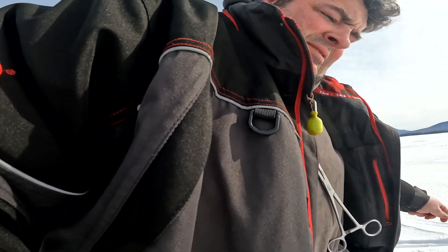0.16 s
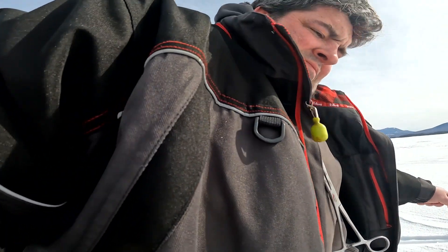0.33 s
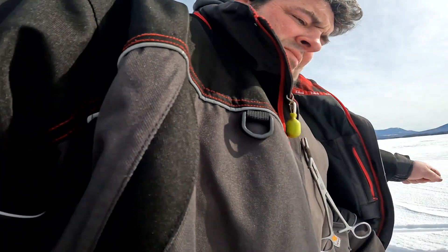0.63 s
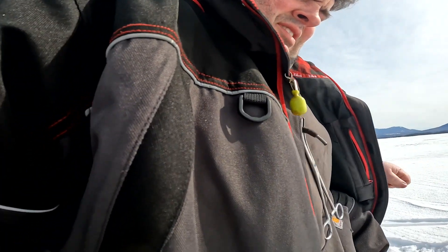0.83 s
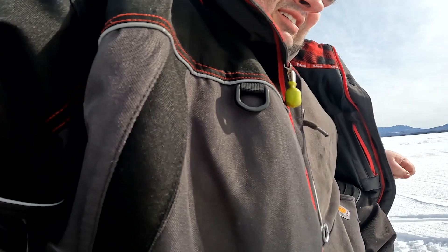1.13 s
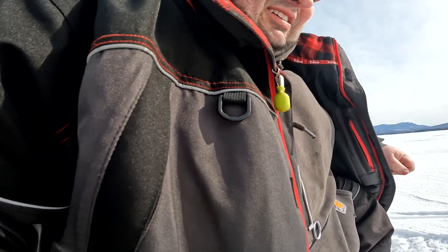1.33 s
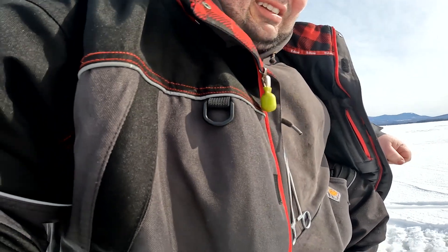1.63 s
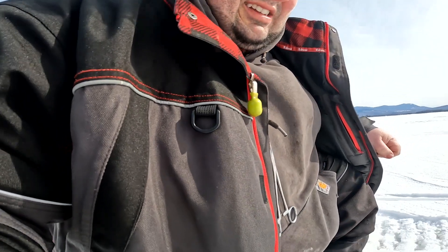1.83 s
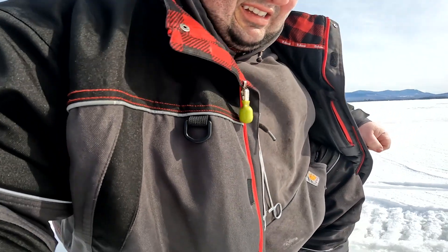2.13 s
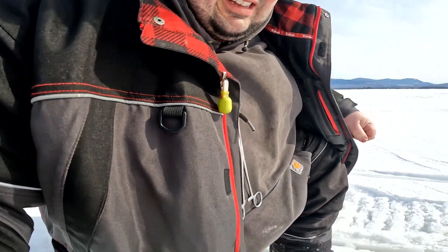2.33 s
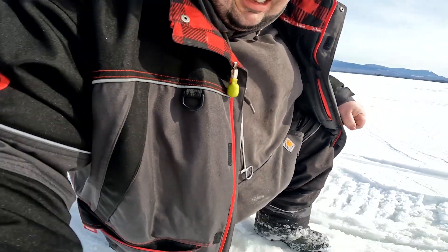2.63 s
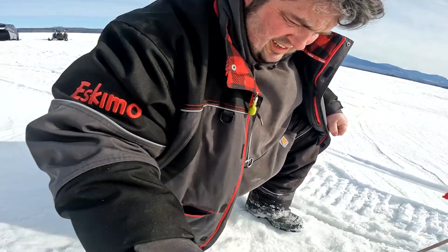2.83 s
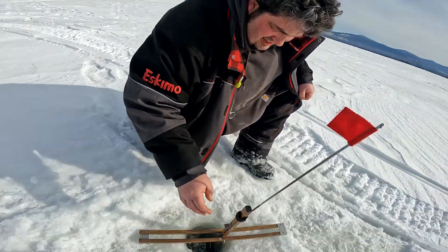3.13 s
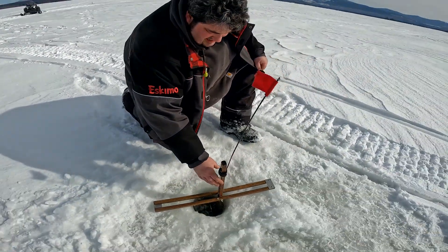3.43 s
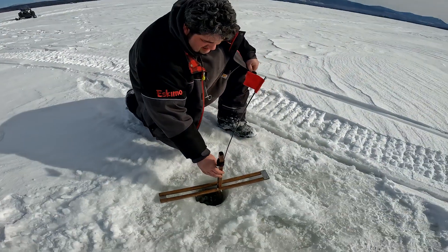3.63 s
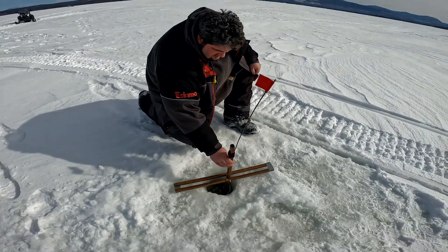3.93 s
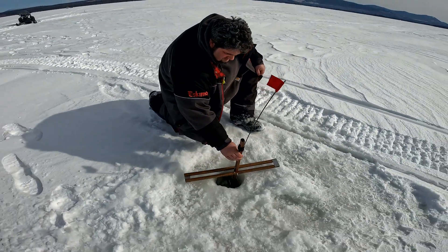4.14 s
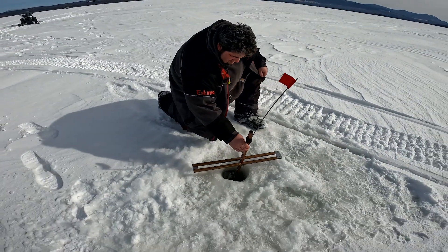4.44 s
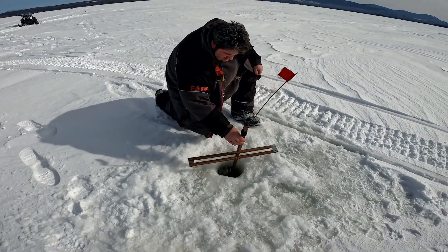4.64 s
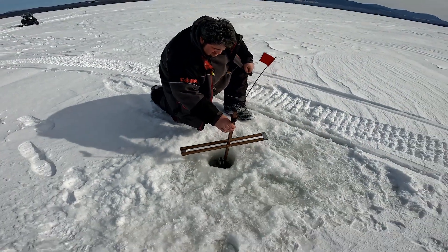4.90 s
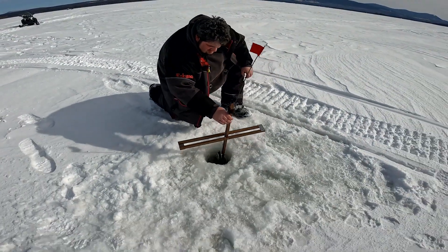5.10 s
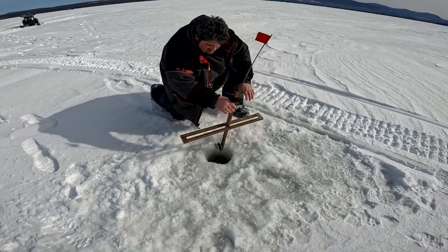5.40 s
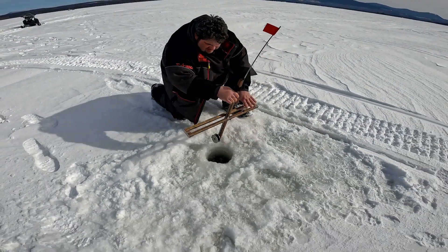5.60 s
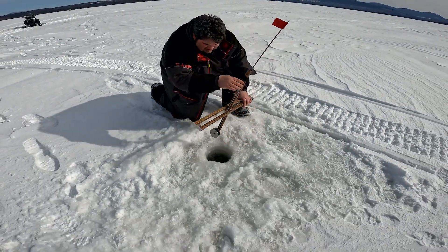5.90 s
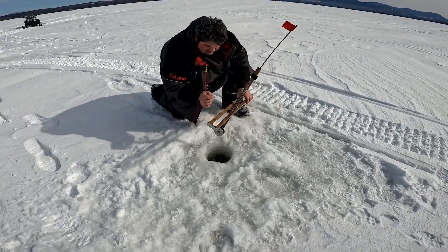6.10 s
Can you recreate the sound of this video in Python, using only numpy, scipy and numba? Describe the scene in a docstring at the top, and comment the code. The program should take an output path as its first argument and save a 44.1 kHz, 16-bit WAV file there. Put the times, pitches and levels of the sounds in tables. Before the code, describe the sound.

Boots crunch and creak on crusty snow while stiff cloth scuffs and knocks the microphone, then wind rumble swells and wooden slats rattle.

```python
"""Someone handles a small camera and steps about on crusty snow on a frozen lake, in wind and open-air hiss.
At first snow and stiff jacket cloth break into short decaying sines: cracks, squeaks, scuffs, housing knocks.
Just after 1 s packed snow creaks by stick and slip, ringing a few low modes.
From about 3.4 s filtered noise of wind on the microphone grows into a rumble, and the top treble weakens.
Near the end wooden slats rattle on their modes, each tap bouncing a few times."""
import sys
import numpy as np
from scipy import signal
from scipy.fft import rfft, irfft
from scipy.io import wavfile
from scipy.ndimage import uniform_filter1d
from numba import njit

SR = 44100
rng = np.random.default_rng(int(sys.argv[2]) if len(sys.argv) > 2 else 0)


def wrap_up_sound(samples):
    """Save the sound to the file named by the first command line argument, as 16-bit audio."""
    columns = np.atleast_2d(samples).T
    # keep every value between -1 and 1, then stretch to whole-number steps
    tamed = np.clip(columns, -1, 1)
    steps = np.round(tamed * 32767).astype(np.int16)
    wavfile.write(sys.argv[1], SR, steps)


N = 276021  # length in samples


def undb(db):
    """Amplitude ratio of a level in dB."""
    return 10 ** (np.asarray(db) / 20)


def level(x, db):
    """Scale a signal to an rms level in dB re 1."""
    return x * undb(db) / np.sqrt(np.mean(x ** 2))


def curves(table):
    """Linear interpolation: columns of a table joined by straight lines, one value a sample."""
    s, *columns = np.transpose(table)
    return [np.interp(np.arange(N) / SR, s, c) for c in columns]


def colour(x, points):
    """Minimum-phase filtering: a causal response through f/Hz, gain/dB points, by way of the cepstrum."""
    hz, db = np.transpose(points)
    grid_hz = np.arange(1, 1026) * SR / 2048
    log_gain = np.interp(np.log(grid_hz), np.log(hz), db) * np.log(10) / 20
    cepstrum = irfft(log_gain)
    # folding the cepstrum onto positive time makes the response causal
    cepstrum[1:1024] *= 2
    cepstrum[1025:] = 0
    impulse = irfft(np.exp(rfft(cepstrum)))[:1024]
    return signal.fftconvolve(x, impulse)[:len(x)]


@njit
def low(x, hz, damp):
    """State-variable low-pass: two integrators in a loop, with an edge that may move every sample."""
    y, band, lowpass = np.empty(len(x)), 0., 0.
    for i in range(len(x)):
        g = np.tan(np.pi * hz[i] / SR)
        v = (band + g * (x[i] - lowpass)) / (1 + g * (g + damp))
        y[i] = lowpass + g * v
        band, lowpass = 2 * v - band, lowpass + 2 * g * v
    return y


@njit
def grains(out, s, hz, t60, size, rise):
    """Damped oscillation: each grain is a fading sine that swells over `rise` cycles, as a soft contact does."""
    y = np.zeros(out)
    for k in range(len(s)):
        turn = np.exp(2j * np.pi * hz[k] / SR - np.log(1000) / (t60[k] * SR))
        closing = np.exp(-hz[k] / (rise * SR))
        z, shut, start = size[k] + 0j, 1., int(s[k] * SR)
        for n in range(start, min(out, start + int(t60[k] * SR))):
            y[n] += z.imag * (1 - shut)
            z *= turn
            shut *= closing
    return y


def walk(rate):
    """Slow random fluctuation: levels held 1 / rate seconds and smoothed twice; spread near 1."""
    k = int(SR / rate)
    held = np.repeat(rng.standard_normal(N // k + 1), k)
    return 1.89 * uniform_filter1d(uniform_filter1d(held, k), k)[:N]


def patter(count, mid_hz, octaves, cycles, spread_db):
    """Shot noise: many small breaks at random moments, exponentially spread in dB; rms 1."""
    when, sign = rng.random(count), rng.choice([-1., 1.], count)
    tone, strength = rng.standard_normal(count), rng.exponential(size=count)
    hz = np.clip(mid_hz * 2 ** (octaves * tone), 100, .45 * SR)
    size = sign * undb(spread_db * np.minimum(strength, 5.0))
    return level(grains(N, when * N / SR, hz, cycles / hz, size, 0.052), 0)


def blows(s, db, hz, crumble_s, break_cycles, cycles, count, octaves, after_db, rise):
    """Fracture cascade: a main break, then a dying swarm of splinters, most near its pitch, a few far above."""
    chance = rng.random((len(s), 3, count))
    lag = 3 * crumble_s * chance[:, 0] ** 1.5
    tone = np.clip(0.884 * hz[:, None] * 2 ** (octaves * chance[:, 1] ** 2), 100, .45 * SR)
    size = undb(db[:, None] + after_db) * (2 * chance[:, 2] - 1)
    size = size * np.exp(-lag / crumble_s) * (hz[:, None] / tone) ** 0.081
    when, tone = (s[:, None] + lag).ravel(), tone.ravel()
    swarm = grains(N, when, tone, cycles / tone, size.ravel(), 0.028)
    return grains(N, s, hz, break_cycles / hz, -undb(db), rise) + swarm


def air():
    """Broadband noise: spectrally shaped, slowly swelling hiss of the open lake."""
    # spectrum of the hiss: f/Hz, relative density/dB
    hiss_spectrum = [(120, -63), (200, -2), (756, -4.5), (3560, -19.5), (7380, -25), (10600, -41),
                     (12500, -31), (14500, -35), (15600, -92)]
    air_db = -55.5  # rms before the swell
    swell = undb(.9 * walk(6))
    return level(colour(rng.standard_normal(N), hiss_spectrum), air_db) * swell


def wind():
    """Turbulence at the microphone port: a deep rumble and uneven buffets whose upper edge varies."""
    # course of the gusts: t/s, buffet level/dB, rumble level before flutter/dB, buffet edge before wander f/Hz
    gusts = [(0, -45.5, -45, 113), (.4, -52, -64, 134), (.52, -46, -38, 134), (.63, -31, -36, 172),
             (.84, -56.5, -51, 104), (1.88, -40.5, -46, 122), (2.42, -37.5, -42, 112),
             (2.7, -47.5, -44.5, 103), (3.36, -28, -32, 168), (3.8, -36, -29.5, 132), (3.94, -22, -40, 177),
             (4.01, -34, -26.5, 123), (4.62, -30, -33, 132), (4.84, -25, -24.5, 198),
             (5.25, -24.5, -23.5, 160), (5.39, -31, -29.5, 145), (5.7, -23.5, -25.5, 199),
             (5.92, -27.5, -27, 194), (5.98, -39, -24.5, 121), (6.2, -34.5, -32, 127),
             (6.26, -39, -53, 111)]
    db, rumble_db, steady_hz = curves(gusts)
    wander_db = .8 * walk(20)
    edge_hz = steady_hz * undb(wander_db)
    deep = low(low(rng.standard_normal(N), np.full(N, 70.), 1.0), np.full(N, 90.), 1.07)
    deep = signal.sosfilt(signal.butter(2, 22, "high", fs=SR, output="sos"), deep)
    flutter_db = walk(14)
    eddies = rng.standard_normal(N) * undb(0.79 * flutter_db)
    # dividing by the root of the edge evens out the power as the band widens
    buffets = low(low(eddies, edge_hz, 1.0), edge_hz * 1.69, 1.23) / np.sqrt(edge_hz)
    buffets = signal.sosfilt(signal.butter(2, 75, "high", fs=SR, output="sos"), buffets)
    rumble = level(deep, 0) * undb(rumble_db + 0.93 * flutter_db)
    return undb(db) * level(buffets, 0) + rumble


def motion():
    """Power addition: gains of crunch, drag and rustle, each scuff climbing, sagging and sinking over a bed."""
    # restless shifting between the scuffs: t/s, crisp crunch gain/dB, dull drag gain/dB, fine rustle gain/dB
    shifting = [(0, -44, -38.5, -55.5), (.5, -42.5, -37, -52), (1.2, -47, -48.5, -59),
                (1.9, -48.5, -45.5, -59.5), (3.0, -47.5, -50, -56.5), (3.7, -46, -49.5, -55),
                (4.05, -40, -40.5, -57.5), (4.5, -53, -51.5, -78), (4.7, -61, -35.5, -57),
                (5.4, -42, -47, -52.5), (5.55, -60, -43.5, -51), (5.92, -46, -42, -51.5),
                (5.97, -57, -64, -52.5), (6.26, -56, -65, -60)]
    # scuffs of boot on crust and sleeve on housing:
    # start t/s, length t/s, crisp crunch gain/dB, dull drag gain/dB, fine rustle gain/dB
    scuffs = [(0.432, 0.02, -41, -31.5, -46), (0.556, 0.031, -22, -24.5, -41.5),
              (0.603, 0.095, -26, -25, -44.5), (0.817, 0.017, -38, -41, -45.5),
              (0.899, 0.066, -44.5, -41, -49), (1.236, 0.04, -39, -33, -47.5),
              (1.303, 0.05, -32, -31.5, -40.5), (1.411, 0.043, -33.5, -47, -54),
              (1.543, 0.24, -58, -42.5, -61), (1.775, 0.082, -38.5, -45, -48.5),
              (2.162, 0.017, -37, -29, -51), (3.033, 0.18, -42, -39.5, -58),
              (3.133, 0.15, -31.5, -52, -42.5), (3.298, 0.086, -28, -41, -42.5),
              (3.453, 0.12, -29.5, -38.5, -48.5), (3.901, 0.12, -30.5, -57, -50),
              (4.131, 0.037, -45, -28.5, -53), (4.226, 0.026, -46, -34, -52), (4.309, 0.021, -40, -32, -61),
              (4.645, 0.011, -34.5, -36, -60), (4.686, 0.14, -31.5, -42, -56),
              (4.835, 0.1, -35.5, -31, -56.5), (5.039, 0.01, -45, -29, -64),
              (5.132, 0.125, -39, -39, -54.5)]
    rise_s, fall_s = 0.0083, 0.03  # time to climb or sink by 20 dB
    sag_db_per_s = 24  # pressure eases while the scuff lasts
    t = np.arange(N) / SR
    power = undb(curves(shifting)) ** 2
    for s, length, *db in scuffs:
        shape_db = 20 * np.minimum(0, np.minimum((t - s) / rise_s, (s + length - t) / fall_s))
        shape_db = shape_db - sag_db_per_s * np.clip(t - s, 0, length)
        power = power + np.outer(undb(db), undb(shape_db)) ** 2
    return np.sqrt(power)


def rustle():
    """Dense shot noise: threads of stiff cloth slip by the thousand in a fine, flickering hiss."""
    fine = patter(count=90000, mid_hz=5900, octaves=0.71, cycles=6.3, spread_db=1.5)
    flicker = undb(1.8 * walk(110))
    return level(flicker * fine, 2.36)


def drag():
    """Stick-slip friction: soft, low grains of cloth catching and slipping on the housing."""
    dull = patter(count=5000, mid_hz=514.5, octaves=0.77, cycles=9.1, spread_db=2.5)
    catching = undb(2.0 * walk(130))
    return level(catching * dull, -1.5)


def rattles():
    """Modal excitation by repeated impact: taps bounce on shared wooden modes, one mode leading each tap."""
    # taps of wooden slats being lifted: t/s, nominal level/dB, leading f/Hz
    taps = [(5.6573, -24, 1470), (5.678, -27.5, 1500), (5.7147, -29, 1440), (5.736, -33.5, 1480),
            (5.828, -29.5, 2280), (5.8628, -31, 2160), (5.9045, -34, 3600), (5.935, -27.5, 3600)]
    # modes of the wood: nominal f/Hz, 60 dB decay t/s
    wood = [(1500, 0.036), (2200, 0.023), (3100, 0.018), (3600, 0.03), (4700, 0.016)]
    bounces = 3
    gap_s, drop_db = .0025, 4  # mean gap and loss from one bounce to the next
    s, db, lead_hz = np.repeat(taps, bounces, axis=0).T.copy()
    bounce = np.tile(np.arange(bounces), len(taps))
    s = s + bounce * gap_s * (.5 + rng.random(len(s)))
    db = db - bounce * drop_db
    chance = rng.standard_normal((len(s), 2, len(wood)))
    total = np.zeros(N)
    for k, (hz, t60) in enumerate(wood):
        # a mode is weaker the more octaves it lies from the leading one
        mode_db = db - 5.0 - 8.5 * np.abs(np.log2(hz / lead_hz)) + 2.3 * chance[:, 1, k]
        mode_hz = hz * (1 + 0.055 * chance[:, 0, k])
        total += grains(N, s, mode_hz, np.full(len(s), t60), undb(mode_db), 0.71)
    return total


def creak():
    """Stick-slip: jerks of packed snow under a boot ring its low modes, which sink as the weight settles."""
    # modes of the snow: nominal f/Hz, 60 dB decay t/s, gain/dB
    snow_modes = [(535, 0.027, 2.5), (720, 0.0093, -0.5), (1370, 0.024, -15)]
    start_s, peak_s, end_s = 1.122, 1.14, 1.235
    peak_db, edge_db = -21, -8  # at the peak; start and end against the peak
    slip_hz = 131  # nominal rate of jerks
    s, db = [start_s, peak_s, end_s], peak_db + edge_db * np.array([1, 0, 1])
    chance = rng.standard_normal((30, 2 + len(snow_modes)))
    slips = start_s + np.cumsum(np.exp(0.33 * chance[:, 0])) / slip_hz
    scatter_db = 4.0 * chance[:, 1]
    size = undb(np.interp(slips, s, db) + scatter_db) * (slips < end_s)
    sink = 1.17 - 2.8 * (slips - start_s)
    total = np.zeros(N)
    for k, (hz, t60, mode_db) in enumerate(snow_modes):
        mode_hz = hz * sink * (1 + 0.08 * chance[:, 2 + k])
        total += grains(N, slips, mode_hz, np.full(len(slips), t60), size * undb(mode_db), 1.0)
    return total


def squeaks():
    """Stick-slip under pressure: cold snow or cloth slips in a rapid run near one pitch, swelling and fading."""
    # squeaks: start t/s, length t/s, nominal grain level/dB, centre f/Hz
    runs = [(0.196, 0.02, -28.5, 3280), (1.431, 0.01, -26, 3230), (3.322, 0.029, -26, 1840),
            (3.555, 0.019, -27.5, 2950), (3.874, 0.016, -16, 2040), (3.937, 0.025, -25.5, 2000),
            (4.722, 0.024, -28, 2700)]
    s, length, db, hz = np.repeat(runs, 14, axis=0).T.copy()  # 14 slips each
    when, tone, size = rng.random((len(s), 3)).T
    hz = hz * (1 + 0.23 * (tone - .5))
    swell = np.sin(np.pi * when)
    return grains(N, s + length * when, hz, 24 / hz, undb(db) * swell * (.5 + size), 0.84)


def knocks():
    """Impulse response: a dull blow makes the housing ring for a handful of cycles."""
    # knocks on the housing: t/s, nominal level/dB, f/Hz
    hits = [(0.285, -22, 430), (0.395, -23, 398), (0.668, -14.5, 404), (0.816, -21.5, 545),
            (1.039, -22.5, 575), (1.239, -7.5, 505), (1.302, -7.5, 510), (1.311, -10, 590),
            (1.322, -5.5, 516), (1.3347, -4, 784), (1.346, -19, 520), (1.781, -16.5, 214),
            (1.891, -24, 374), (2.17, -18.5, 545), (2.18, -18.5, 670), (2.802, -22, 156),
            (3.139, -7.5, 464), (4.315, -13.5, 397), (4.843, -17, 600), (4.872, -17, 630),
            (5.139, -18.5, 500), (5.2, -17, 584)]
    s, db, hz = np.transpose(hits).copy()
    return blows(s, db, hz, crumble_s=.004, break_cycles=11.5, cycles=11.5, count=6,
                 octaves=2.8, after_db=-6.0, rise=0.66)


def crunch():
    """Brittle fracture as shot noise: crisp grains of breaking crust in bunches, with lone snaps among them."""
    crisp = patter(count=20000, mid_hz=1657, octaves=0.68, cycles=9.9, spread_db=1.0)
    snaps = patter(count=1200, mid_hz=1393, octaves=0.63, cycles=7.9, spread_db=8.0)
    bunch = undb(2.0 * walk(220))
    return level(bunch * crisp, -7.5) + level(snaps, -12.0)


def cracks():
    """Brittle fracture: crust or stiff cloth snaps in a sharp spike that crumbles on for some milliseconds."""
    # single cracks: t/s, nominal level/dB, f/Hz
    breaks = [(0.125, -16.5, 2260), (0.445, -20, 1370), (0.5613, -13, 1600), (0.5674, -7, 1590),
              (0.573, -7.5, 1400), (0.582, -10, 1420), (0.601, -15, 1500), (0.6218, -15, 1620),
              (0.641, -10.5, 2080), (0.6695, -16, 1210), (1.2394, -18, 1120), (1.254, -20, 1000),
              (1.3065, -14, 1330), (1.409, -17, 1030), (1.5642, -17.5, 3650), (1.805, -17.5, 1190),
              (2.026, -28, 1185), (2.099, -24, 1160), (2.1152, -24, 1000), (2.135, -24, 890),
              (2.1612, -16.5, 880), (2.7728, -12, 1230), (3.049, -26.5, 1460), (3.0959, -19, 990),
              (3.1376, -9.5, 930), (3.186, -19, 2300), (3.1962, -8.5, 1970), (3.2268, -5.5, 2010),
              (3.2465, -21, 1800), (3.261, -22, 2000), (3.272, -8.5, 2660), (3.3055, -12.5, 2780),
              (3.3195, -3.5, 1640), (3.3382, -4.5, 1670), (3.3647, -7.5, 1520), (3.3697, -7, 1920),
              (3.3914, -16.5, 1500), (3.415, -25, 1500), (3.465, -14.5, 1720), (3.49, -17, 3020),
              (3.516, -29, 1090), (3.5493, -17.5, 1090), (3.5631, -13.5, 1630), (3.632, -21.5, 1400),
              (3.705, -23.5, 2040), (3.8715, -12.5, 2650), (3.8752, -7.5, 2110), (3.9045, -14, 2000),
              (3.9095, -11.5, 1670), (3.951, -19, 1510), (4.2285, -28, 1090), (4.68, -24, 1200),
              (5.171, -21, 2360), (5.457, -19, 3730), (5.5851, -11, 2700)]
    s, db, hz = np.transpose(breaks).copy()
    return blows(s, db, hz, crumble_s=0.004, break_cycles=6.0, cycles=11.0, count=24,
                 octaves=2.1, after_db=-8.5, rise=0.1)


def scene():
    """Superposition: nearby contacts share the microphone's colouring; wind and air are added beside them."""
    # response of the microphone to the contacts: f/Hz, gain/dB
    mic_response = [(20, -4), (3000, 3.5), (5000, -0.5), (7800, -4), (9500, -11.5), (11500, -10.5),
                    (12500, 1), (14500, -13), (16000, -34)]
    crisp, dull, fine = motion()
    scuffing = crisp * crunch() + dull * drag() + fine * rustle()
    contacts = scuffing + creak() + squeaks() + cracks() + knocks() + rattles()
    return (wind() + colour(contacts, mic_response) + air())[None]


def record(dry):
    """Band limiting: treble above an edge weakens from a set moment; a steep low-pass cuts the top throughout."""
    dull_s, fade_s = 3.38, 0.04  # onset and duration of the weakening
    dull_hz, dull_db = 11240, -27  # edge and gain of the weakened treble
    top_hz = 15735
    s = np.arange(N) / SR
    soft = signal.sosfilt(signal.butter(10, dull_hz, fs=SR, output="sos"), dry)
    share = np.clip((s - dull_s) / fade_s, 0, 1)
    heard = (1 - share) * dry + share * (soft + undb(dull_db) * (dry - soft))
    return signal.sosfilt(signal.ellip(10, .2, 80, top_hz, fs=SR, output="sos"), heard)


dry = scene()
out = record(dry)
wrap_up_sound(out)
```